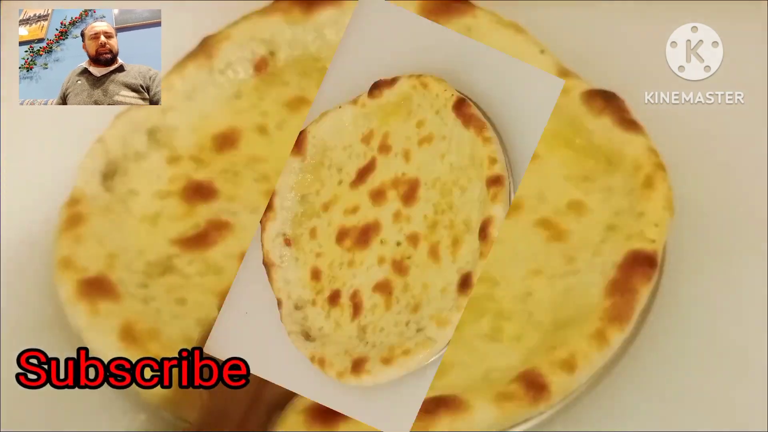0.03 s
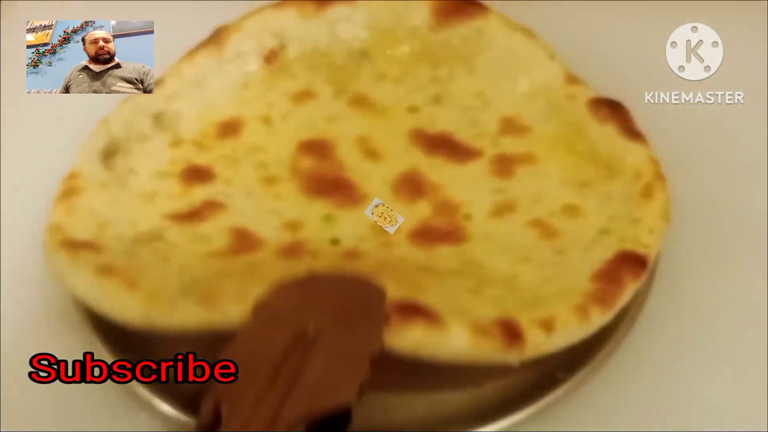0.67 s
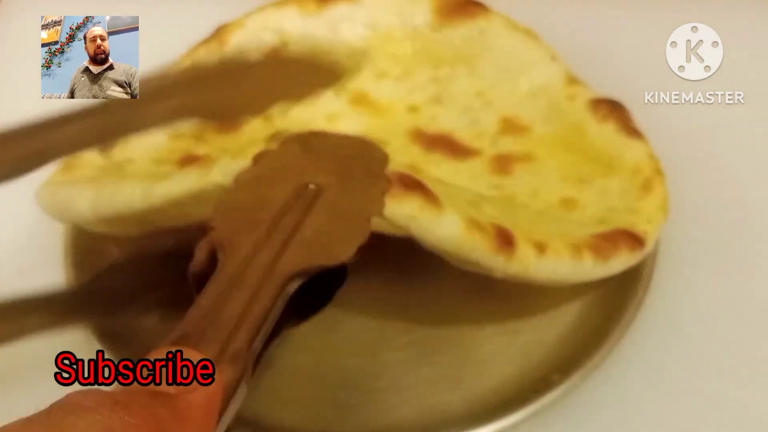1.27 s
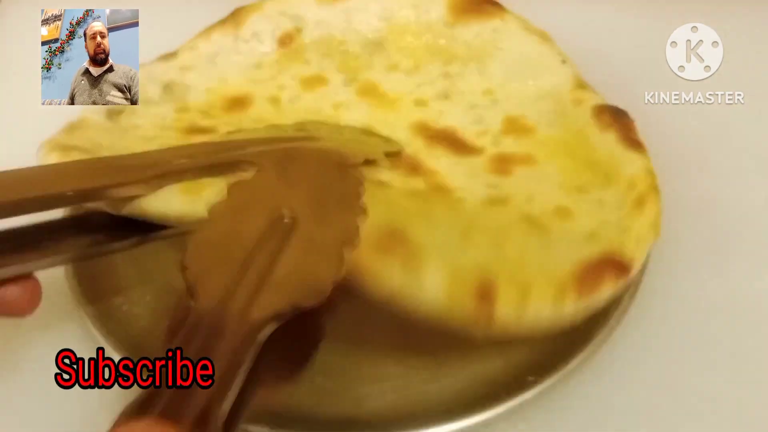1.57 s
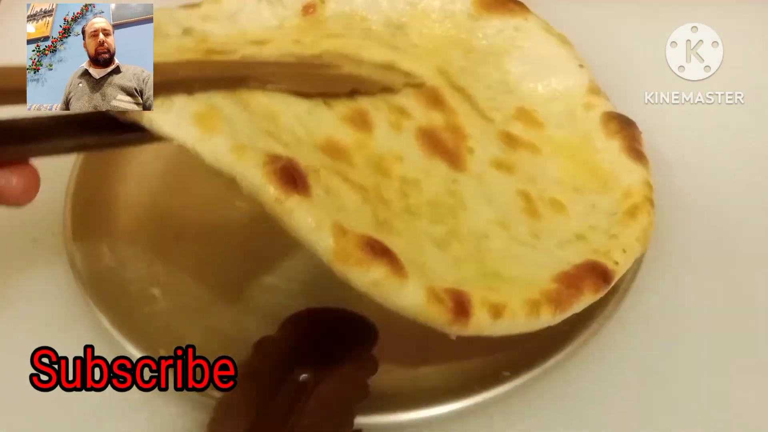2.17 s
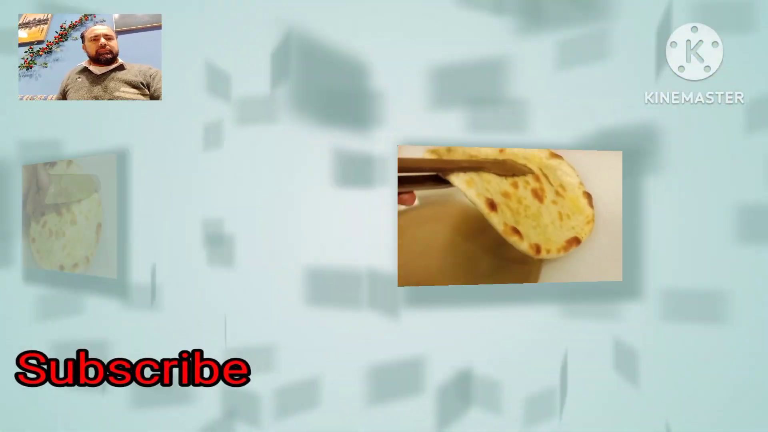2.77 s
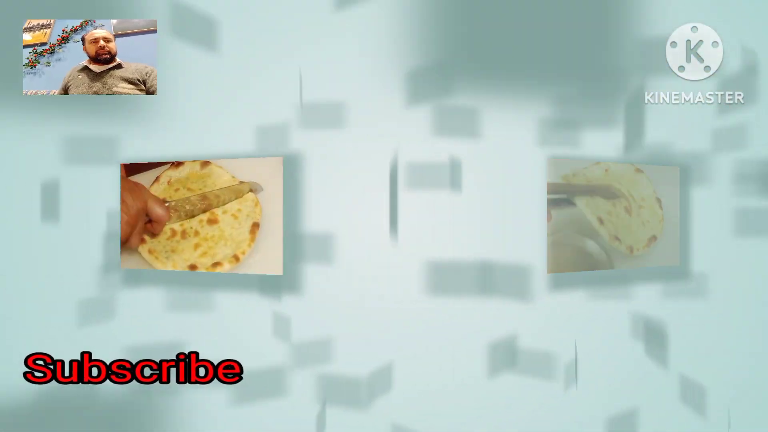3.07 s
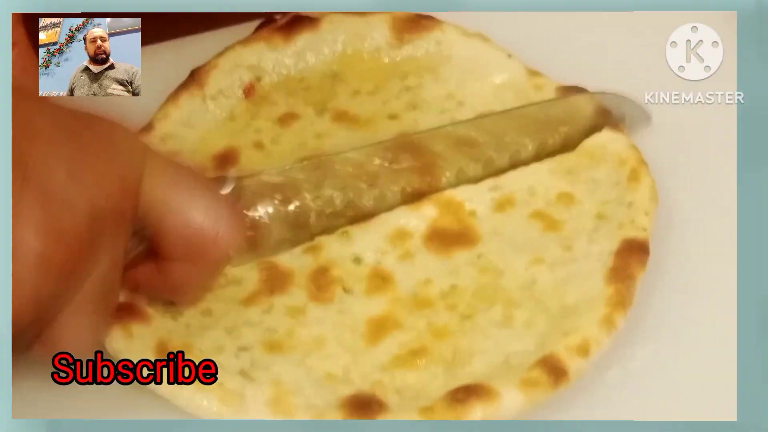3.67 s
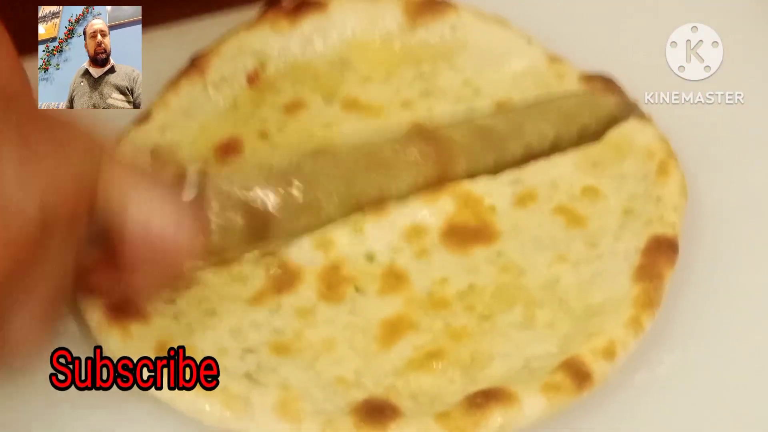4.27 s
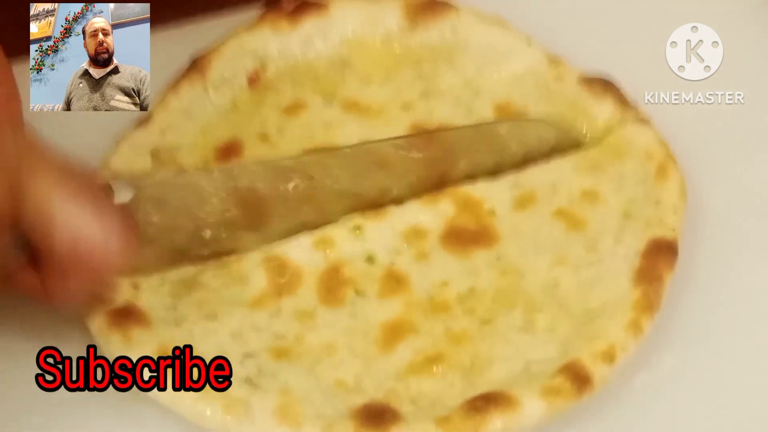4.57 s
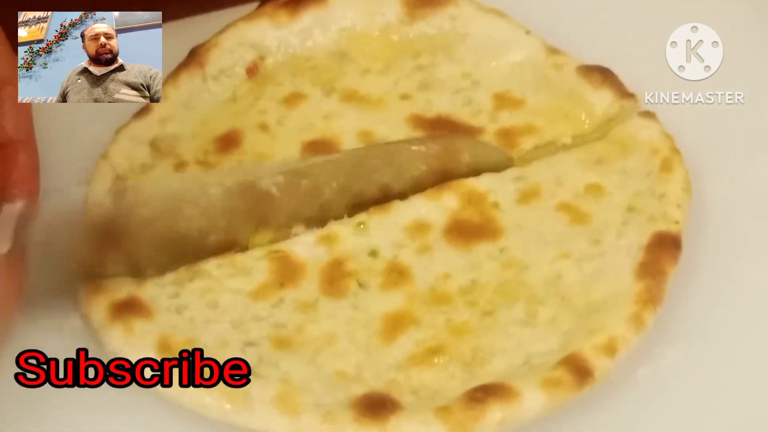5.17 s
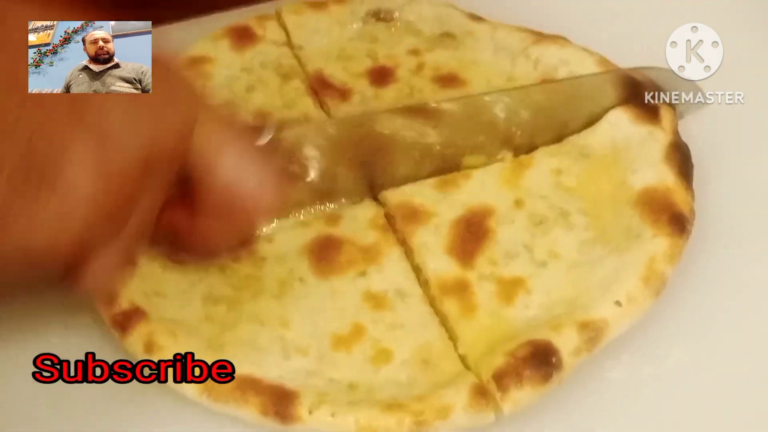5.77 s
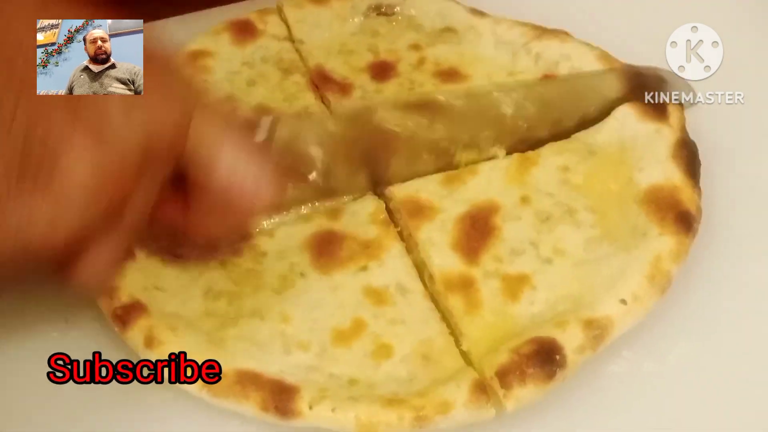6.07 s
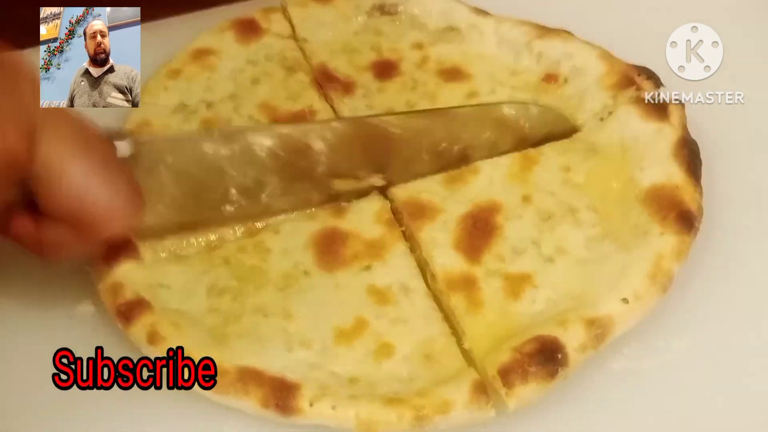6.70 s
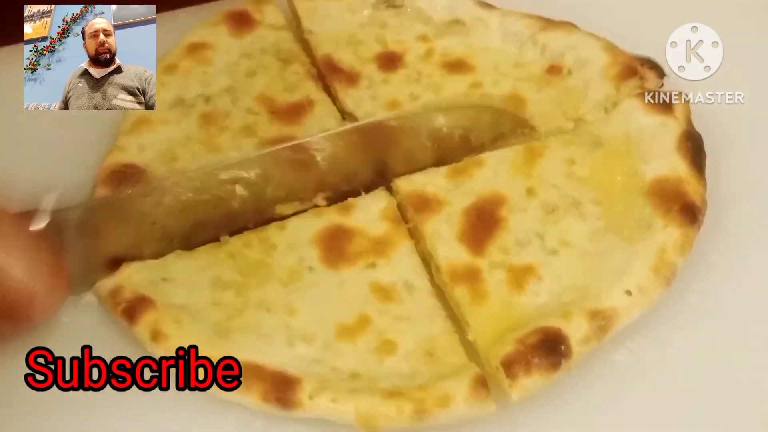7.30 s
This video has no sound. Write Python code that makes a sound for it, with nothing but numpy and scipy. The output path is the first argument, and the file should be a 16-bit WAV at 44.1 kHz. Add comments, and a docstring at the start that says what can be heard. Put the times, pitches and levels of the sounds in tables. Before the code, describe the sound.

In a small, hushed kitchen, steel tongs softly nudge a crisp flatbread, then clank and slide under it. A steel plate gives a bright clank, scrapes along and lets out a thin, high squeal. A knife then cuts through the crust in short, quiet crunches with light blade ticks, while the board rumbles softly under the strokes. Everything sounds close.

```python
"""In a hushed, small kitchen, steel tongs squeak faintly and nudge a crisp flatbread: the worktop rumbles
and the crust crackles. The tongs clank and slide under the bread; then the steel plate clanks, scrapes,
groans and gives a thin stick-slip squeal as it is dragged. Last, a long knife is pressed and drawn
through the bread on a board: the crust crunches in short bursts of tiny fractures, the blade ticks,
and the board rumbles under the strokes."""
import sys
import numpy as np
from scipy import signal
from scipy.fft import rfft, irfft
from scipy.io import wavfile
from scipy.ndimage import uniform_filter1d

SR = 44100
rng = np.random.default_rng(int(sys.argv[2]) if len(sys.argv) > 2 else 0)


def file_out(sig):
    """Save sig as 16-bit WAV at sys.argv[1]."""
    # one column per channel
    cols = np.atleast_2d(sig).T
    # limit, then scale
    lim = np.clip(cols, -1, 1)
    pcm = np.round(lim * 32767).astype(np.int16)
    wavfile.write(sys.argv[1], SR, pcm)


N = 328104
TIME = np.arange(N) / SR


def amp(db):
    """Decibels to gain."""
    return 10 ** (np.asarray(db) / 20)


def unit(x):
    """Scales to rms 1."""
    return x / np.sqrt(np.mean(x ** 2) + 1e-20)


def read(points, hz):
    """Reads a curve along a log-frequency axis."""
    point_hz, value = np.transpose(points)
    return np.interp(np.log(hz + 1), np.log(point_hz + 1), value)


def add(mix, start_s, sound):
    """Mixes a sound in at its cue."""
    part = mix[max(round(start_s * SR), 0):][:len(sound)]
    part += sound[:len(part)]


def colour(x, eq, size=4096):
    """Minimum-phase EQ along the given curve."""
    log_gain = np.log(amp(read(eq, abs(np.fft.fftfreq(size, 1 / SR)))))
    taps = np.fft.ifft(np.exp(np.conj(signal.hilbert(log_gain)))).real
    return signal.fftconvolve(x, taps[:size // 2])[:len(x)]


def resonate(x, hz, width_hz):
    """A fixed or moving resonance of gain 1."""
    turn = np.exp(2j * np.pi * np.cumsum(hz * np.ones(len(x))) / SR)
    pole = np.exp(-np.pi * width_hz / SR)
    return 2 * (turn * signal.lfilter([1 - pole], [1, -pole], x / turn + 1e-18)).real


def resonate_twice(x, hz, width_hz):
    """Two resonances in series, for steeper skirts."""
    return resonate(resonate(x, hz, width_hz), hz, width_hz)


def drift(rate_hz):
    """Smooth random modulation of rms 1, up to about the given rate."""
    hz = np.fft.rfftfreq(N, 1 / SR)
    return unit(irfft(rfft(rng.standard_normal(N)) * np.exp(-(hz / rate_hz) ** 2), N))


def grains(count, per_s, spread_db):
    """Tiny random slips or fractures; a positive spread makes a few louder, a negative one softer."""
    size = amp(spread_db * np.minimum(rng.exponential(1, count), 3))
    return size * rng.choice([-1, 1], count) * (rng.random(count) < per_s / SR)


def wander(x, depth_db, patch_hz, patch_s, size=1024):
    """Narrow bands swell and fade at random, as they do when a point of contact moves."""
    frames = dict(nperseg=size, noverlap=size * 3 // 4)
    spectra = signal.stft(x, **frames)[2]
    per_hz = np.fft.fftfreq(spectra.shape[0], SR / size)[:, None]
    per_s = np.fft.fftfreq(spectra.shape[1], size / 4 / SR)
    smooth = np.exp(-(per_hz * patch_hz) ** 2 - (per_s * patch_s) ** 2)
    patches = unit(np.fft.ifft2(np.fft.fft2(rng.standard_normal(spectra.shape)) * smooth).real)
    gain = unit(amp(depth_db * np.clip(patches, -2, 2)))
    return signal.istft(spectra * gain, **frames)[1][:len(x)]


def steady(x):
    """Evens out slow swings, as a steady hand does."""
    return x / np.sqrt(abs(uniform_filter1d(x ** 2, size=2600)) + 1e-12)


def stroke(start_s, end_s, from_db, to_db, attack_s, release_s):
    """Envelope of one movement: it sets in, grows or slackens evenly, and lets go."""
    early, late = np.maximum(start_s - TIME, 0), np.maximum(TIME - end_s, 0)
    fades = np.exp(-np.minimum(early / attack_s + late / release_s, 20))
    return amp(np.interp(TIME, [start_s, end_s], [from_db, to_db])) * fades


# Room tone EQ: freq_hz, gain_db
HUSH_EQ = [(15, -50), (25, -26), (59, -6.5), (119, -8), (152, 0.5), (445, -13.5), (804, -9), (1380, -12),
           (1660, -12), (3340, -27.5), (3630, -25.5), (4260, -27.5), (5580, -23), (8580, -45), (15500, -45)]
def kitchen_hush(level_db=-68):
    """A low bed of noise whose colour gently shifts."""
    noise = colour(rng.standard_normal(N), HUSH_EQ)
    return amp(level_db) * unit(wander(noise, depth_db=4, patch_hz=153.4, patch_s=0.09))


# Faint squeaks of the tongs: start_s, end_s, pitch_hz, level_db
TONG_SQUEAKS = [(0, 0.677, 5400, -93), (.071, 0.143, 3490, -84), (0.212, 0.293, 3537, -73.5),
                (1.49, 1.51, 2100, -56), (1.443, 1.504, 5800, -62), (1.555, 1.61, 2700, -72),
                (1.75, 1.788, 3570, -73.5), (2.85, 2.886, 5400, -56)]
def tong_squeaks(waver_hz=18, flutter_db=1.5):
    """Now and then the steel sticks and slips on a single thin note."""
    waver = waver_hz * drift(60)
    flutter = amp(flutter_db * drift(40))
    out = np.zeros(N)
    for start, end, hz, db in TONG_SQUEAKS:
        now = (TIME > start) & (TIME < end)
        arch = np.sin(np.pi * (TIME[now] - start) / (end - start))
        phase = 2 * np.pi * np.cumsum(hz + waver[now]) / SR
        out[now] += amp(db) * np.sqrt(2) * arch * np.sin(phase)
    return out * flutter


# The tongs push the bread, the knife saws it:
# start_s, end_s, rumble_from_db, rumble_to_db, thud_offset_db, rub_offset_db
PUSHES = [(0.018, 0.59, -78, -65.5, -12, -22), (0.894, 1.3, -59, -57.5, -18.5, -15.5),
          (1.338, 2.276, -57.5, -58.5, -9, -7.5), (2.346, 2.844, -52, -60, -10, -13),
          (2.934, 3.214, -59.5, -65, -32, -11.5), (4.557, 5.152, -57, -53, -9, -11.5),
          (5.2, 5.3, -59.5, -58.5, -11, -4), (5.368, 5.491, -52, -48, -10.5, -11),
          (5.992, 6.613, -74, -72, -12.5, 4), (6.72, 7.268, -53.5, -50, -10.5, -13),
          (7.3, 7.45, -56, -48.5, -15, -13.5)]
# Tongs or knife bear down briefly: start_s, rumble_db, rub_db
BUMPS = [(0.673, -56, -66), (0.76, -58.5, -79), (1.394, -52.5, -52), (1.56, -57, -57), (2.41, -50, -51),
         (3.764, -61, -93.5), (4.067, -64, -58.5), (4.34, -59, -66.5), (4.6, -58, -59.5), (4.831, -70, -53),
         (5.1, -58.5, -55), (5.858, -57.5, -62.5), (6.115, -65, -73), (6.665, -63, -58), (7.18, -67, -59)]
def hand_effort(bump_hold_s=0.012, bump_thud_db=-15):
    """Three envelopes: how hard the hand drives the rumble, the thud and the rub."""
    moves = []
    for start, end, from_db, to_db, thud_db, rub_db in PUSHES:
        push = stroke(start, end, from_db, to_db, attack_s=0.036, release_s=0.033)
        moves.append(push * amp([[0], [thud_db], [rub_db]]))
    for start, rumble_db, rub_db in BUMPS:
        bump = stroke(start, start + bump_hold_s, 0, 0, attack_s=0.021, release_s=0.028)
        moves.append(bump * amp([[rumble_db], [rumble_db + bump_thud_db], [rub_db]]))
    return np.sqrt(sum(move ** 2 for move in moves))


# The board's rumbling body: freq_hz, gain_db
BOARD_EQ = [(60, -26.5), (110, -9), (145, 4.5), (170, -1), (205, -8), (260, -17), (315, -13), (390, -25.5),
            (700, -38), (2000, -79.5)]
# Its dull thud under the hand's weight: freq_hz, gain_db
THUD_EQ = [(15, -40), (30, -20), (45, -9.5), (65, -2), (100, 0), (130, -10), (250, -36), (1000, -72.5)]
# Soft bread rubbing: freq_hz, gain_db
RUB_EQ = [(150, -21), (330, 3.5), (460, -4.5), (620, -1), (900, 4), (1300, -5), (1900, -7.5), (2600, -19.5),
          (4000, -17), (7000, -28), (10000, -60.5)]
def worktop(note_hz=144.4, note_db=-5, throb_db=1.6):
    """Dragging and pressing shake the board, whose lowest mode throbs; the soft bread rubs above it."""
    rumbling, thudding, rubbing = hand_effort()
    slips = grains(N, per_s=780, spread_db=4.5)
    note = unit(resonate_twice(slips, note_hz, width_hz=19))
    body = unit(wander(colour(slips, BOARD_EQ), depth_db=5, patch_hz=50, patch_s=0.081, size=4096))
    rumble = amp(throb_db * drift(19)) * steady(body + amp(note_db) * note)
    thud = unit(colour(grains(N, per_s=600, spread_db=-0.5), THUD_EQ))
    rub = colour(grains(N, per_s=1500, spread_db=1.5), RUB_EQ)
    rub = unit(wander(rub, depth_db=9.5, patch_hz=138, patch_s=0.056, size=2048))
    return amp(-1.5) * rumbling * rumble + amp(1) * thudding * thud + amp(-3) * rubbing * rub


# The crust gives way, first under the tongs, then under the knife: time_s, relative_db, dull_body_db
CRUNCHES = [(0.47, -68, -16), (0.5483, -66, -16), (0.675, -62, 2), (0.7083, -63, -7), (0.7926, -71.5, 17),
            (3.2918, -53, -5.5), (3.3822, -58, 4.5), (3.509, -55.5, -1), (3.6273, -53.5, -13.5),
            (3.763, -48, -9), (3.7813, -43.5, -14), (3.91, -57.5, -14.5), (4.0359, -39.5, -11),
            (4.0473, -50.5, -2), (4.148, -53, 0.5), (4.3016, -52, -26), (4.4009, -58, -18.5),
            (4.8165, -43.5, -17), (4.8262, -34, -20), (5.062, -51.5, -19), (5.0715, -37.5, -21),
            (5.083, -37, 5), (5.455, -59, -5.5), (5.761, -56, -16.5), (5.781, -57, 2),
            (5.9462, -55.5, -13.5), (6.0886, -55, -22), (6.64, -48, 5), (6.653, -49.5, 12), (6.938, -54, 1),
            (7.168, -52, -10), (7.177, -41.5, -18), (7.4227, -48.5, -18.5)]
# The snap of dry crust: freq_hz, gain_db
CRUST_EQ = [(200, -25), (700, -2.5), (1500, -7), (3500, -5), (4500, -2), (5100, -3.5), (5700, 3.5),
            (6600, -2), (7400, -6.5), (9000, -20.5), (13600, -33), (14900, -9)]
# The blade's short ring, heard in the crunches and the ticks: pitch_hz, gain_db, t60_s
BLADE_MODES = [(3200, -12, .05), (4480, -2, .06), (5450, -2, .06), (5750, -3, .04), (6200, -3, .04),
               (6580, -1, .05), (7950, -8, .07), (9700, -22, .03), (11200, -21, .03), (14680, -13, .05)]
def crust(firm_db=-40, build_s=0.003, decay_s=0.005, linger_per_db=0.025, lead_s=0.04, size=6000):
    """Each crunch is a swarm of fractures that builds and dies away; each flake has its own pitches."""
    out = np.zeros(N)
    t = np.arange(size) / SR - lead_s
    flake_hz = rng.uniform(1667, 11860, size=(len(CRUNCHES), 16))
    for (time_s, db, body_db), pitches in zip(CRUNCHES, flake_hz):
        stretch = np.exp(linger_per_db * (firm_db - db))  # firm crunches are quick, gentle ones linger
        swell = 2 / (np.exp(-t / (build_s * stretch)) + np.exp(t / (decay_s * stretch)))
        snaps = colour(grains(size, per_s=2400, spread_db=2) * swell, CRUST_EQ)
        flake = sum(resonate(snaps, hz, width_hz=90) for hz in pitches)
        steel = sum(resonate(snaps, hz, width_hz=93) for hz, _, _ in BLADE_MODES)
        crunch = snaps + amp(11) * flake + amp(4) * steel
        crunch /= np.sqrt(np.sum(crunch ** 2) / np.sum(swell ** 2))
        body = amp(body_db) * resonate(crunch, hz=640, width_hz=1580)
        add(out, time_s - lead_s, amp(db) * (crunch + body))
    return amp(-10) * out


def steel_ring(modes, uneven_db=2, size=16384):
    """Dying partials of struck steel, balanced a little differently on each hit."""
    t = np.arange(size) / SR
    hz, db, t60 = np.transpose(modes)[:, :, None]
    phase = 2 * np.pi * rng.random(hz.shape)
    db = db + uneven_db * (2 * rng.random(hz.shape) - 1)
    partials = amp(db - 60 * t / t60) * np.sin(2 * np.pi * hz * t + phase)
    return partials.sum(0) / np.linalg.norm(amp(db)) * np.sqrt(2)


# The crack at the front of a steel hit: freq_hz, gain_db
CRACK_EQ = [(200, -37.5), (700, -27), (1700, -5.5), (3000, -10.5), (4400, -1.5), (6500, -3), (7500, -11.5),
            (10000, -21.5), (13800, -27.5), (14900, -13), (16000, -17)]
def steel_hits(hits, modes, focus_db, attack_s, contact_s, crack_db, clang_db, ring_db):
    """Steel chatters for a few milliseconds of contact, then rings on more softly."""
    out = np.zeros(N)
    loudest_db = max(db for _, db, _ in hits)
    for start_s, db, focus_hz in hits:
        # the place of contact picks out the modes near one pitch
        tone = steel_ring([(hz, gain_db + focus_db * np.exp(-((hz - focus_hz) / 500) ** 2), t60)
                           for hz, gain_db, t60 in modes])
        t = np.arange(len(tone)) / SR
        contact = np.exp(-(t / contact_s) ** 4)
        crack = colour(rng.standard_normal(len(tone)) * contact, CRACK_EQ)
        crack /= np.sqrt(np.sum(crack ** 2) / np.sum(contact ** 2))
        force = amp(0.25 * (db - loudest_db))  # gentle touches start slower and crack less
        hit = force * amp(crack_db) * crack + tone * (amp(clang_db) * contact + amp(ring_db))
        attack = np.minimum(force * t / attack_s, 1)
        add(out, start_s, amp(db) * hit * attack)
    return out


def steel_slide(slides, modes, eq, hiss_db, ring_db, release_s):
    """Steel on steel: uneven slips hiss and keep the modes singing."""
    slips = unit(grains(N, per_s=1300, spread_db=-6))
    singing = sum(amp(db) * resonate(slips, hz, width_hz=50) for hz, db, _ in modes)
    scrape = amp(hiss_db) * unit(colour(slips, eq)) + amp(ring_db) * unit(singing)
    pressure = sum(stroke(*slide, attack_s=0.008, release_s=release_s) for slide in slides)
    return pressure * wander(scrape, depth_db=4, patch_hz=170, patch_s=0.27)


# Hits on the tongs: start_s, relative_db, focus_hz
TONG_HITS = [(1.3703, -19, 5800), (1.3834, -28, 4150), (2.1296, -44, 3700)]
# The ring of the tongs: pitch_hz, gain_db, t60_s
TONG_MODES = [(820, -15, .15), (1324, -13, .2), (1933, -5, .12), (2030, -6, .11), (2832, -1, .15),
              (3634, -2.5, .15), (4037, -5, .14), (4102, -5, .13), (5023, -9, .17), (5249, -3, .14),
              (5443, -3, .18), (5650, -2, .12), (5927, -5, .14), (6465, -7, .19), (6675, -8, .16),
              (6858, -8, .2), (7434, -14, .14)]
# Their slide across the plate: start_s, end_s, from_db, to_db
TONG_SLIDE = [(1.4, 1.58, -47, -48)]
# The hiss of that slide: freq_hz, gain_db
TONG_EQ = [(200, -28), (500, -20), (850, -8), (2000, -11), (3000, -5), (3800, 3), (5500, 5), (6800, -1.5),
           (8000, -11.5), (10000, -55), (13800, -18), (15000, -13)]
def tongs():
    """The tongs clank against the plate and slide under the bread."""
    clank = steel_hits(TONG_HITS, TONG_MODES, focus_db=5, attack_s=0.0005, contact_s=0.0031,
                       crack_db=-15.5, clang_db=-9, ring_db=-20.5)
    scrape = steel_slide(TONG_SLIDE, TONG_MODES, TONG_EQ, hiss_db=-3.5, ring_db=-13, release_s=0.059)
    return clank + scrape


# Hits on the plate: start_s, relative_db, focus_hz
PLATE_HITS = [(2.2957, -42, 4800), (2.3072, -38.5, 5040), (2.3973, -12.5, 6370), (2.5621, -34, 5150)]
# The ring of the plate: pitch_hz, gain_db, t60_s
PLATE_MODES = [(1297, -14, .18), (1599, -10, .22), (1771, -11, .15), (2353, -9, .16), (2650, -12, .13),
               (2837, -12, .2), (3096, -8, .16), (3738, -8, .15), (3867, -7, .15), (4318, -4, .13),
               (4385, 1.5, .16), (4515, -5, .14), (5100, -13, .14), (5448, -12, .2), (5760, -12, .2),
               (6067, -11, .17), (6207, -6, .18), (6258, -3, .18), (6337, -1, .21), (6455, -3, .17),
               (6800, -14, .2), (8371, -17, .11), (14850, -20, .1)]
# Its scrapes: start_s, end_s, from_db, to_db
PLATE_SLIDES = [(2.298, 2.385, -58.5, -69), (2.5, 2.92, -61.5, -70.5), (2.97, 3.17, -81, -77)]
# The hiss of those scrapes: freq_hz, gain_db
PLATE_EQ = [(200, -19), (600, -16), (1200, -5), (2000, -5.5), (2800, -5), (4000, -1), (5500, 6.5),
            (6800, -1.5), (8000, -18), (10000, -37.5), (13800, -37.5), (15000, -24.5)]
def plate():
    """The steel plate clanks brightly and scrapes along."""
    clank = steel_hits(PLATE_HITS, PLATE_MODES, focus_db=2, attack_s=0.00041, contact_s=0.0062,
                       crack_db=-14, clang_db=-9.5, ring_db=-20.5)
    scrape = steel_slide(PLATE_SLIDES, PLATE_MODES, PLATE_EQ, hiss_db=6.5, ring_db=-7.5, release_s=0.02)
    return clank + scrape


# Drags that make the plate groan: start_s, end_s, from_db, to_db
GROAN_DRAGS = [(2.57, 2.79, -59.5, -72.5), (2.877, 3.057, -61, -69)]
# Resonances of the groan: pitch_hz, width_hz, gain_db
GROAN_MODES = [(1171, 160, -0.5), (1265, 33, 3.5), (1670, 60, -7), (1810, 150, -5.5)]
def plate_groan():
    """The dragged plate's slips stir a few midrange resonances."""
    slips = grains(N, per_s=810, spread_db=1)
    groan = sum(amp(db) * resonate_twice(slips, hz, width) for hz, width, db in GROAN_MODES)
    drag = sum(stroke(*row, attack_s=0.026, release_s=0.075) for row in GROAN_DRAGS)
    return amp(1) * drag * unit(groan)


# The path of the dragged plate's squeal: time_s, pitch_hz, relative_db
SQUEAL_PATH = [(2.82, 5390, -74), (2.931, 5376, -49), (2.945, 5345, -47.5), (3.05, 5335, -50.5),
               (3.14, 5390, -48.5), (3.212, 5316, -51), (3.37, 5360, -74.5)]
def plate_squeal(waver_hz=42, flutter_db=4, octave_db=-25, halo_db=-8, fade_s=0.014):
    """Stick and slip hold one high, unsteady note with a weak octave, in a halo of friction."""
    time_s, hz, db = np.transpose(SQUEAL_PATH)
    pitch = np.interp(TIME, time_s, hz) + waver_hz * drift(80)
    phase = 2 * np.pi * np.cumsum(pitch) / SR
    tone = np.sin(phase) + amp(octave_db) * np.sin(2 * phase)
    note = unit(tone * amp(flutter_db * drift(82)))
    halo = unit(resonate_twice(rng.standard_normal(N), pitch, width_hz=420))
    outside_s = abs(TIME - np.clip(TIME, time_s[0], time_s[-1]))
    envelope = amp(np.interp(TIME, time_s, db)) * np.exp(-outside_s / fade_s)
    return amp(-2) * envelope * (note + amp(halo_db) * halo)


# Ticks of the blade: start_s, relative_db, focus_hz
BLADE_TICKS = [(4.5735, -38, 6200), (4.7276, -50.5, 5600), (5.0026, -46, 6040), (5.01, -37.5, 14700),
               (5.7115, -53.5, 5100), (6.0444, -53.5, 5100), (6.063, -52.5, 6150), (6.797, -52.5, 4490),
               (6.917, -47, 6820), (7.067, -48.5, 5400), (7.335, -50.5, 7940)]
def blade():
    """The knife ticks as its edge breaks through; the bread damps its ring."""
    return steel_hits(BLADE_TICKS, BLADE_MODES, focus_db=13.5, attack_s=0.0017, contact_s=0.0082,
                      crack_db=-12.5, clang_db=-14, ring_db=-15.5)


# The kitchen's reverb time: freq_hz, t60_s
ROOM_DECAY = [(150, 0.12), (1000, 0.3), (4000, 0.22), (7000, 0.18), (10000, 0.21), (15000, 0.047)]
def room(x, predelay_s=0.004, size=20000):
    """A small hard kitchen: dense reflections, the top treble dying first."""
    reflections = grains(size, per_s=2700, spread_db=-3) * (np.arange(size) / SR > predelay_s)
    hz, t, spectra = signal.stft(reflections, SR, nperseg=256)
    decay = amp(-60 * t / read(ROOM_DECAY, hz)[:, None])
    tail = signal.istft(spectra * decay, SR, nperseg=256)[1]
    return signal.fftconvolve(x, tail / np.linalg.norm(tail))[:N]


def scene():
    """Steel and crust with their reverb, over the kitchen's hush and the worktop's rumble, in mono."""
    steel = tongs() + tong_squeaks() + plate() + plate_groan()
    squeal = plate_squeal()
    cutting = crust() + blade()
    reverb = room(amp(-5) * steel + amp(-9) * squeal + amp(-6) * cutting)
    return (steel + squeal + cutting + reverb + kitchen_hush() + worktop())[None]


def record(dry):
    """A steep low-pass trims the very top of the mix."""
    lowpass = signal.firwin(511, cutoff=15650, window=("kaiser", 8), fs=SR)
    return signal.oaconvolve(dry, lowpass[None], "same")


dry = scene()
out = record(dry)
file_out(out)
```